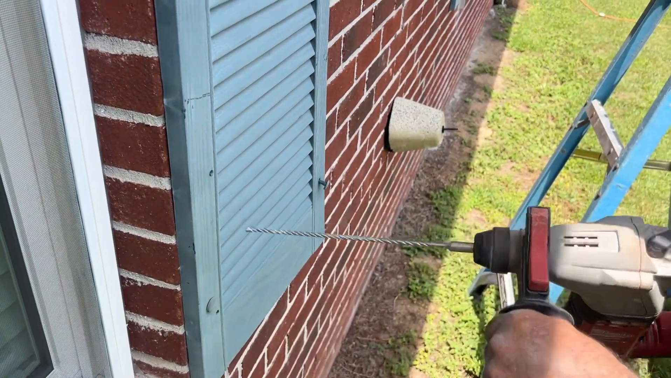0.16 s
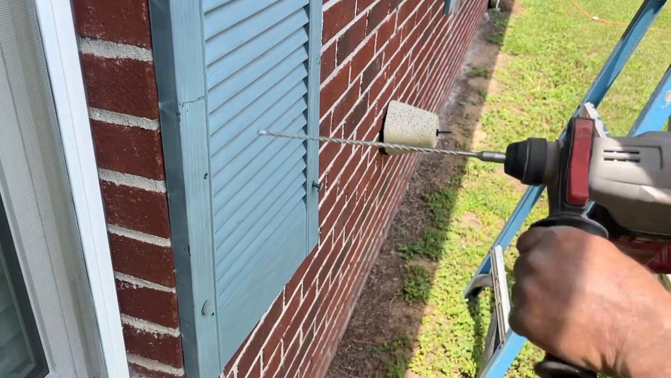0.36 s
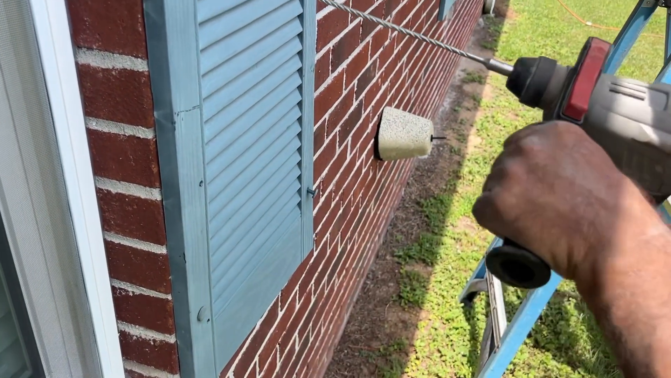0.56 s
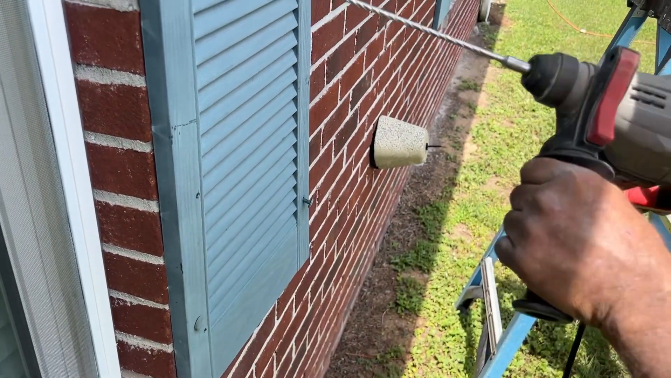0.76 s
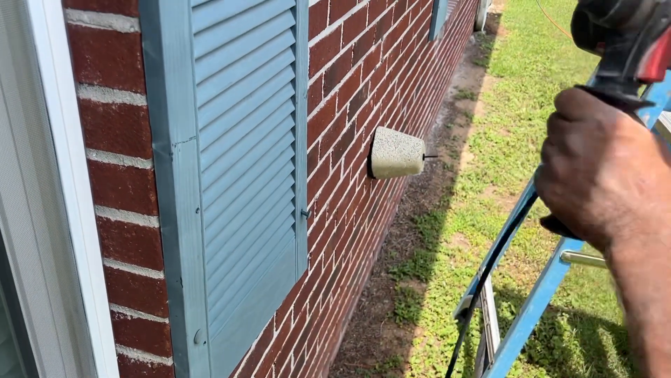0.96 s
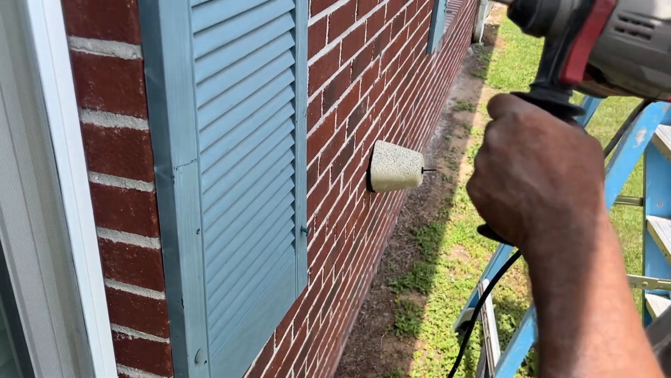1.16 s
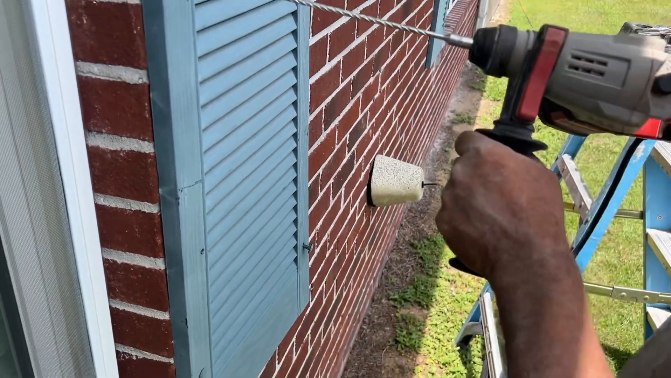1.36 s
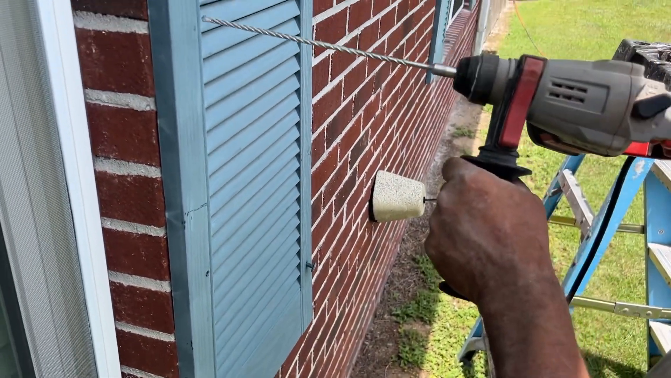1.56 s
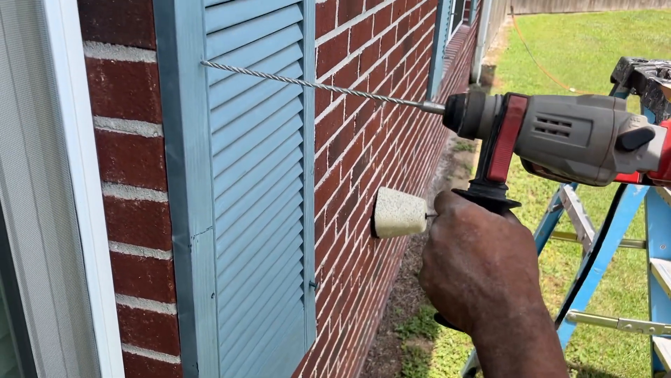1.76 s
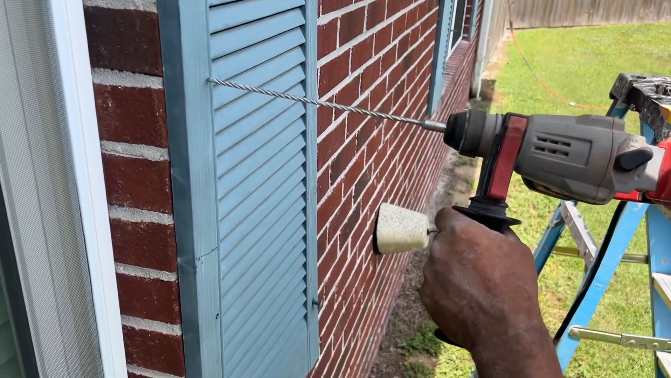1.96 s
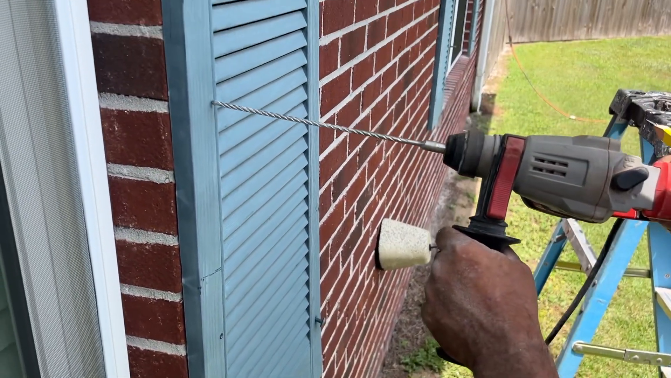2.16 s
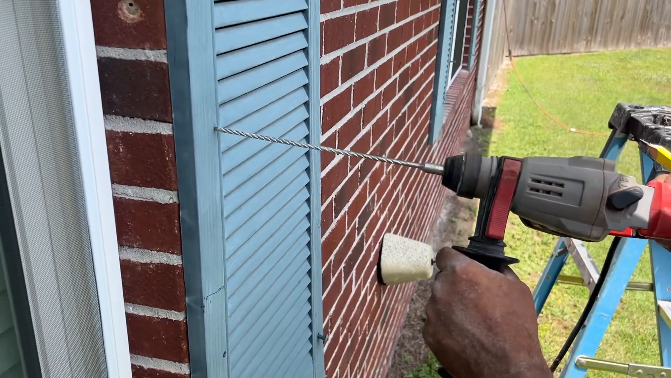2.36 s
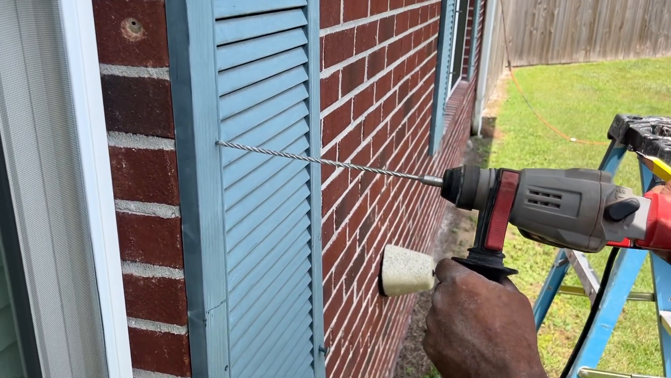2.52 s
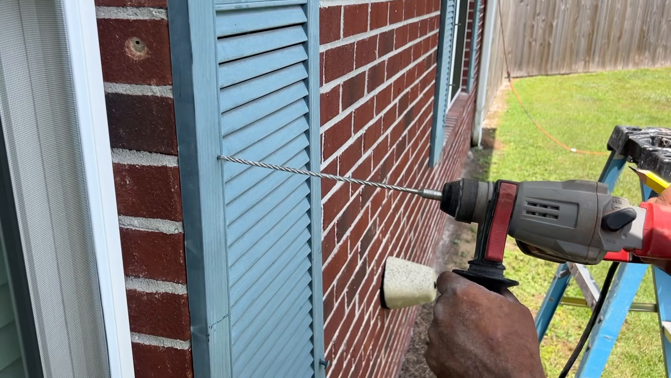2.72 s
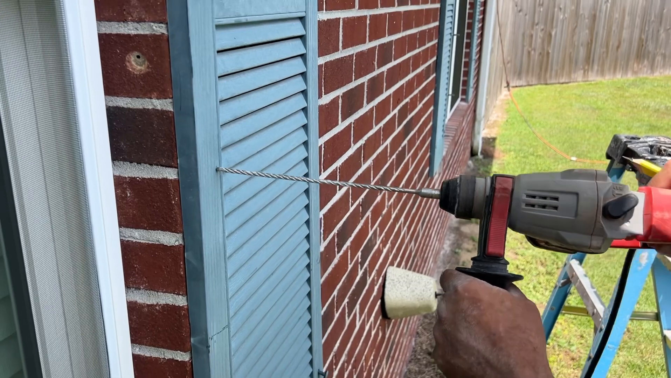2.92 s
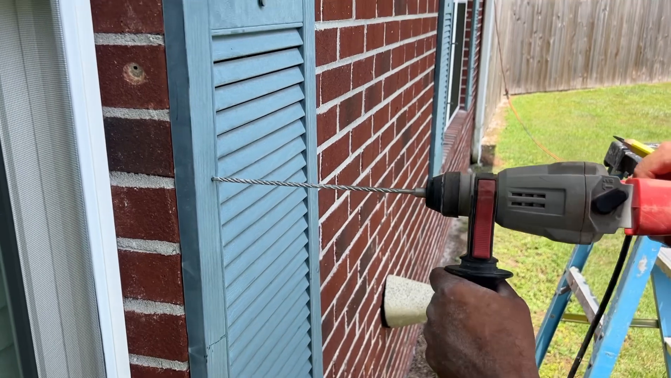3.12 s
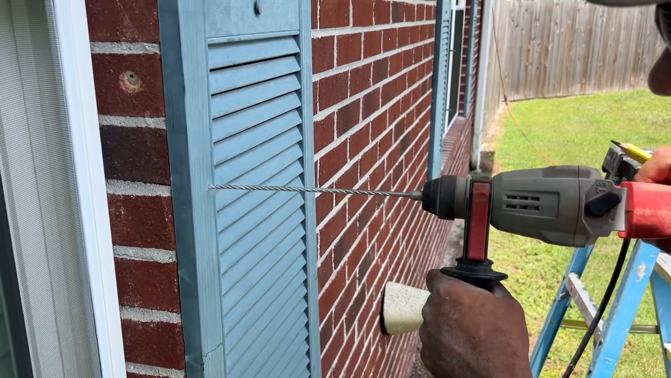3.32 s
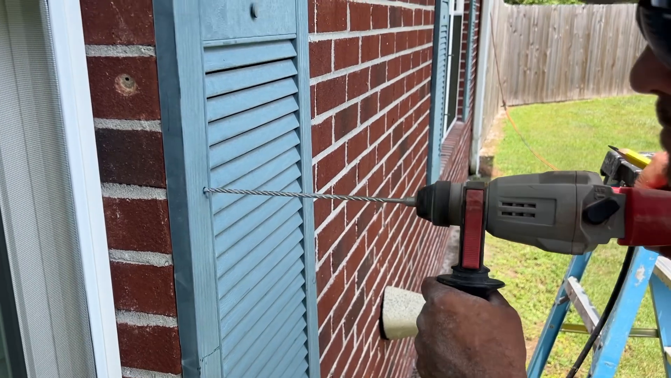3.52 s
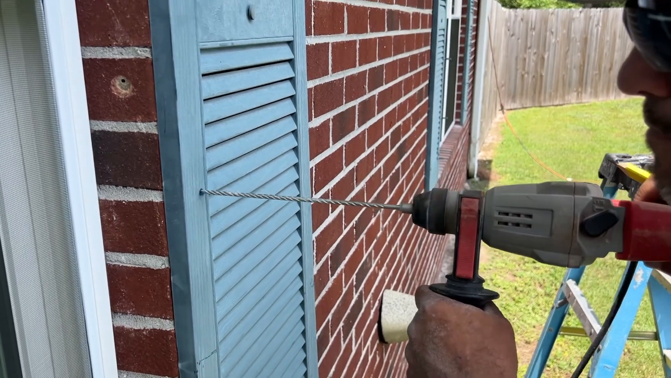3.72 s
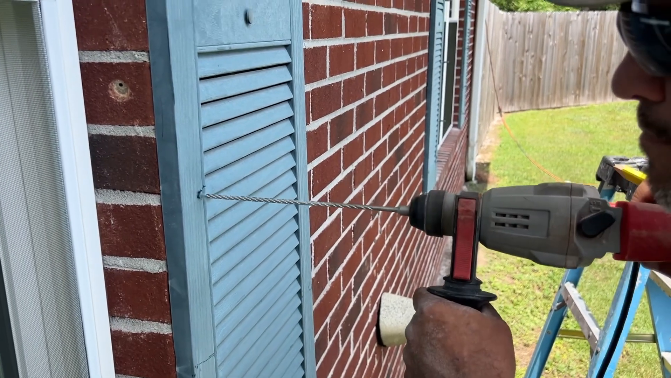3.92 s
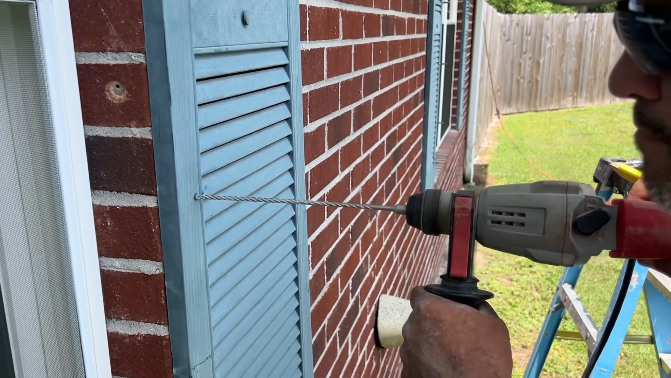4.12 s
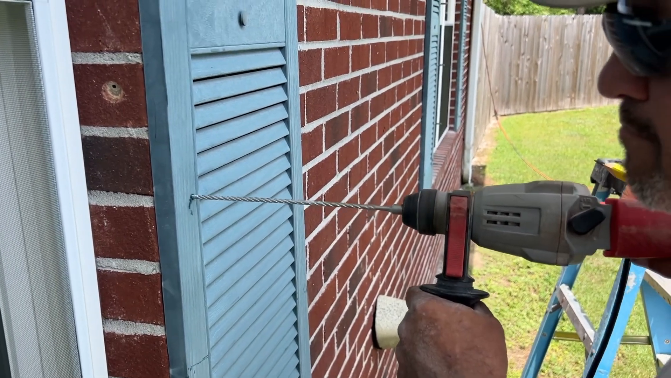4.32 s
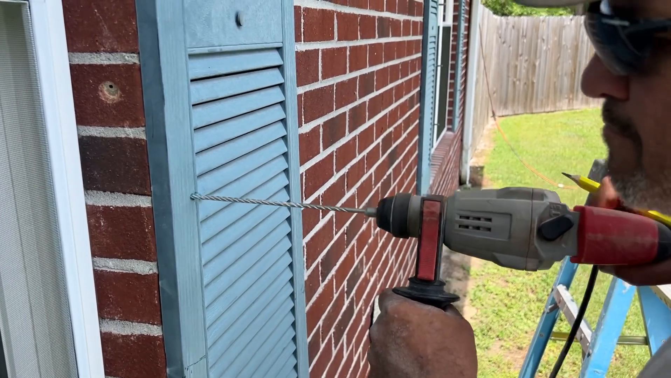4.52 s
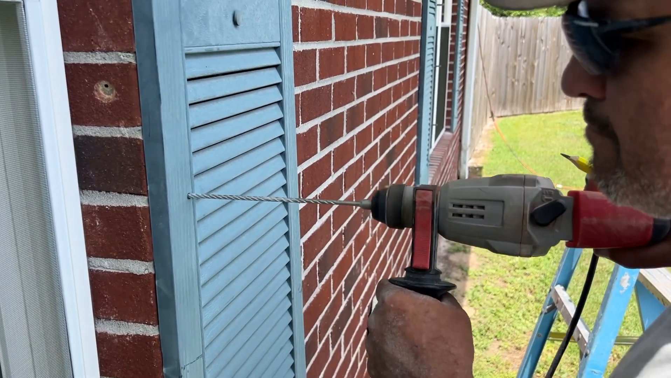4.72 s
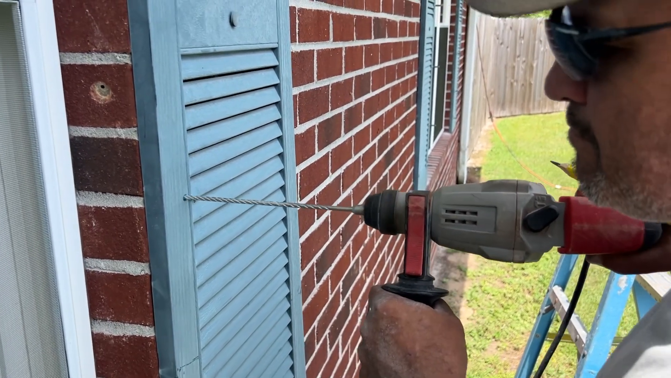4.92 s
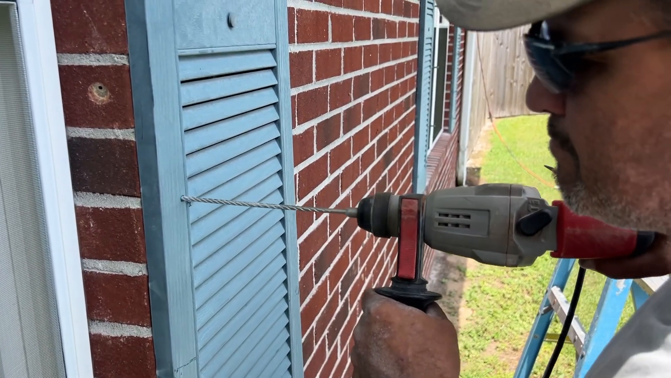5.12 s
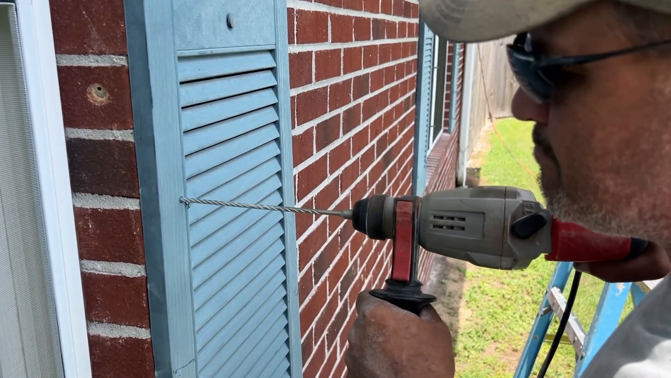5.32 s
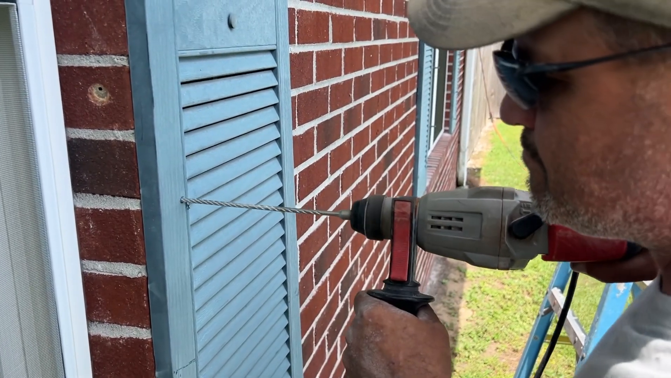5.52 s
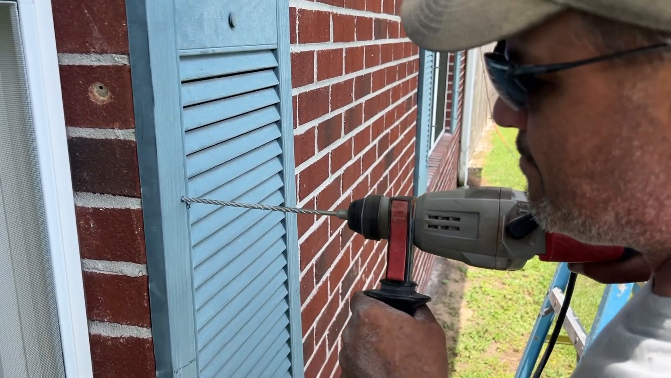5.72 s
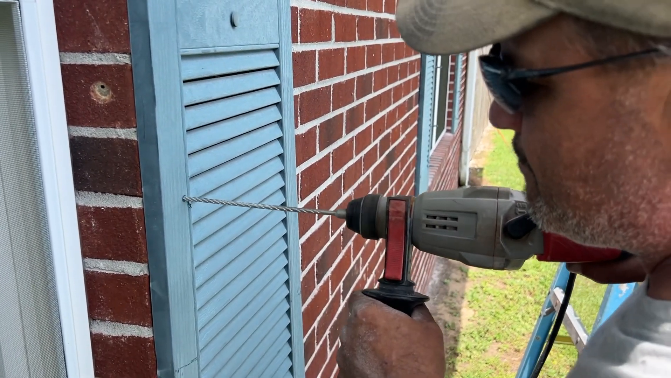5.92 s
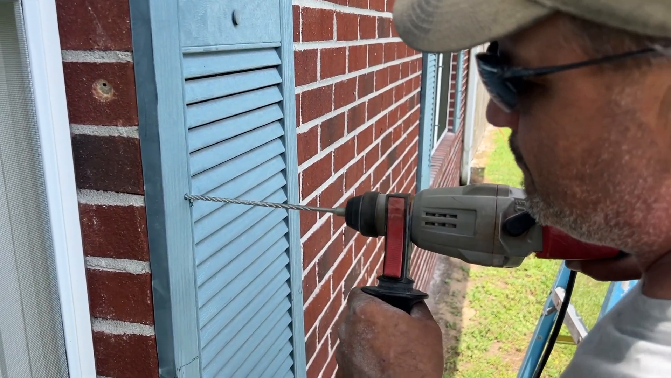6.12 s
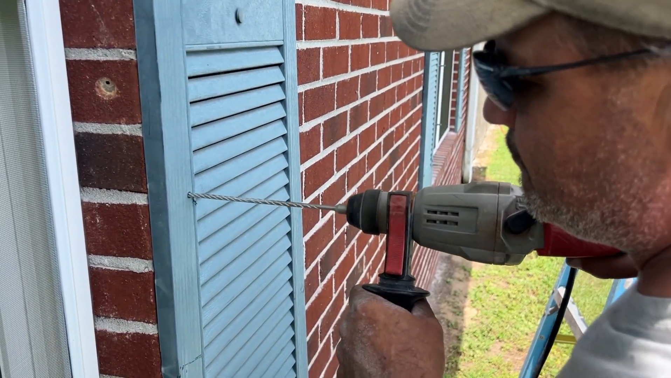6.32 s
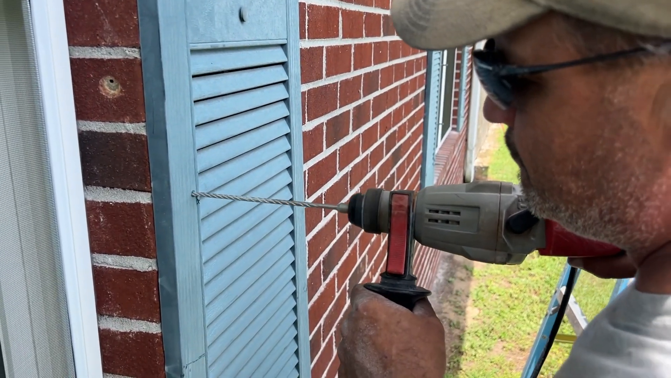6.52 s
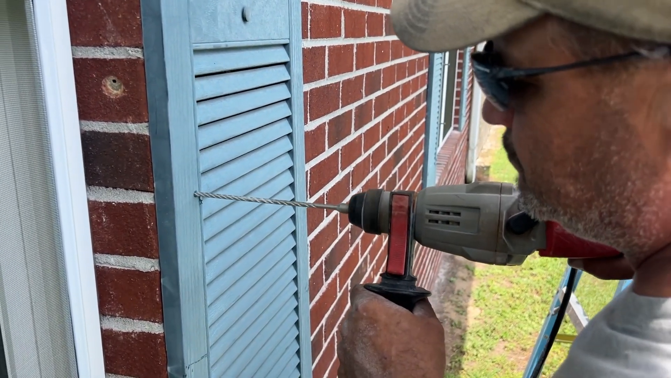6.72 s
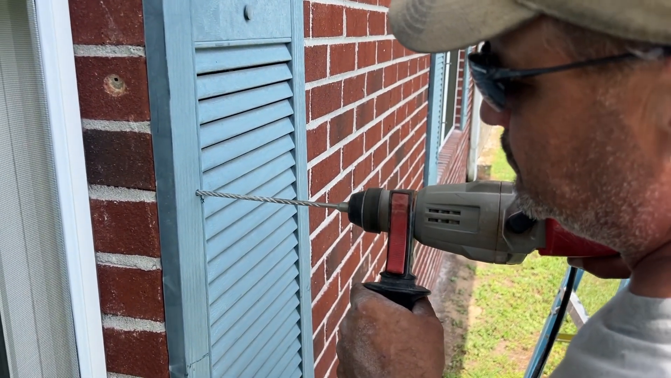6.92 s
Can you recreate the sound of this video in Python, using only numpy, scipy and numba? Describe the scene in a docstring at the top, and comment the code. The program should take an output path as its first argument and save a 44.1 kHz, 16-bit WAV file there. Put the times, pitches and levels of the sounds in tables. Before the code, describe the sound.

A rotary hammer clunks and coasts down to a stop, taps brick in a quiet yard, then restarts with ringing, clattering blows and drills in.

```python
"""A rotary hammer beside a brick house wall clunks and coasts to a stop: roaring noise and whine sink.
In the pause, over air and a hum heard throughout, the bit lightly touches the wall and birds whistle.
The motor spins up, and the striker rings the tool's resonances at every stroke, with cracks and thuds.
Then the bit bites, and the ringing blows sink into the noise of gears and fan and the piston's tones."""
import sys
import numpy as np
from scipy import signal
from scipy.fft import rfft, irfft
from scipy.io import wavfile
from scipy.ndimage import uniform_filter1d
from numba import njit

SR = 44100
rng = np.random.default_rng(int(sys.argv[2]) if len(sys.argv) > 2 else 0)


def store_wav(level_fs):
    """Save 16-bit WAV to argv[1]."""
    pcm = np.round(np.clip(np.atleast_2d(level_fs), -1, 1) * 32767)
    wavfile.write(sys.argv[1], SR, pcm.T.astype(np.int16))


N = 307377   # samples
TIME = np.arange(N) / SR   # seconds
BINS = np.maximum(np.arange(N // 2 + 1) * SR / N, 1)   # Hz

TRIGGER_S, BITE_S = 3.2, 4.48   # motor on; the bit bites
FIRST_BLOW_S = 3.2961


def from_db(db):
    """Turn a level in dB into a plain gain."""
    return 10 ** (np.asarray(db) / 20)


def rms_one(x):
    """Scale a signal to an rms of 1."""
    return x / np.sqrt(np.mean(x ** 2) + 1e-20)


def at_hz(points):
    """Read a table of (Hz, value) at every frequency, along a logarithmic pitch scale."""
    hz, values = np.transpose(points)
    return np.interp(np.log(BINS), np.log(hz), values)


def drift(rate_hz):
    """Smooth random wavering with an rms of 1; a higher rate wavers faster."""
    # made at a fortieth of the sample rate, then filled in
    r = np.exp(-80 * np.pi * rate_hz / SR)
    slow = signal.lfilter([1], [1, -2 * r, r * r], rng.standard_normal(N // 40 + 2002))[2000:]
    return np.interp(np.arange(N) / 40, np.arange(len(slow)), rms_one(slow))


def ring(clicks, hz, t60):
    """Each click starts a dying sine, as in a struck bar; it falls 60 dB in t60 seconds."""
    r = from_db(-60 / (t60 * SR))
    turn = 2 * np.pi * hz / SR
    return signal.lfilter([0, np.sin(turn)], [1, -2 * r * np.cos(turn), r * r], clicks + 1e-18)


def swell_and_ring(clicks, hz, t60):
    """Bending waves spread out along the bit, so a mode builds up, the lower the slower."""
    build_up_s = .0024 * np.sqrt(7700 / hz)
    return ring(clicks, hz, t60) - ring(clicks, hz, build_up_s)


# How wide the noise sounds in stereo.
# Each row: frequency in Hz, level of the side signal (left against right) next to the middle in dB.
STEREO_WIDTH = [(60, -29.5), (110, -16.5), (200, -23), (380, -12.5), (700, -8.5), (1290, -17),
                (2380, -14.5), (4400, -8.5), (5600, -7), (8120, -9.5), (11000, -5.5), (15000, -1.5)]


def wide(gain, source):
    """Two unrelated noises become the middle and side of a stereo sound, coloured; rms 1."""
    mid, side = rfft(source) * gain
    side = side * from_db(at_hz(STEREO_WIDTH))
    return rms_one(irfft(np.array([mid + side, mid - side]), N))


TOP_SPEED = 97   # strokes per s
COAST_AT_S, COAST_SPEED = .2, 90.5   # a moment of the coasting; strokes per s then
COAST_DRAG_S, COAST_FRICTION = 2.11, 78.5   # s; strokes per s
# How fast the piston runs under power.
# Each row: time in seconds, speed in strokes per second.
POWERED_SPEED = [(3.2, 0), (3.2964, 33.02), (3.34, 46.51), (3.4, 60.84), (3.5, 73.09), (3.62, 82.13),
                 (3.8, 89.35), (4.0, 93.35), (4.2, 95.29), (4.45, 95.95), (4.7, 94.65), (4.95, 92.82),
                 (5.2, 90.5), (5.7, 89.5), (6.3, 90.75), (6.97, 89.89)]


def speed():
    """Strokes per second: drag and friction slow the coasting motor to a stop; power follows its curve."""
    drag = np.exp((COAST_AT_S - TIME) / COAST_DRAG_S)
    coast = (COAST_SPEED + COAST_FRICTION) * drag - COAST_FRICTION
    powered = np.interp(TIME, *np.transpose(POWERED_SPEED))
    return np.where(TIME < TRIGGER_S, np.clip(coast, 0, TOP_SPEED), powered)


def strokes():
    """Count the piston's strokes by adding up its speed; a whole number falls on each blow."""
    turns = np.cumsum(speed()) / SR
    return turns - turns[round(FIRST_BLOW_S * SR)]


def by_state(coasting, idling, biting):
    """One value for each state of the tool; idling blends quickly into biting."""
    bitten = np.clip((TIME - BITE_S) / .04 + .5, 0, 1)
    return np.where(TIME < TRIGGER_S, coasting, idling + bitten * (biting - idling))


CRAWL = 11.1   # strokes per s added in the level law, so that a slow motor still sounds
SURGE_RISE_S, SURGE_S = 0.067, 0.86   # rise and decay of the surge at the bite
WAKE_DB, WAKE_S = 27, 0.029   # held back at the trigger; how fast that fades
STOP_DB, STOP_DB_PER_S = -12, -250   # drop, then fade, when the motor stands


def level_db(law, crawl=CRAWL):
    """Level that follows the speed and, after the bite, surges and creeps up; it dies at rest."""
    coast_db, coast_power, idle_db, idle_power, bite_db, surge_db, creep_db_per_s = law
    v = speed()
    since_bite = np.maximum(TIME - BITE_S, 0)
    ratio_db = 20 * np.log10((v + crawl) / TOP_SPEED)
    wake_db = WAKE_DB * np.exp(-np.maximum(TIME - TRIGGER_S, 0) / WAKE_S)
    surge = (1 - np.exp(-since_bite / SURGE_RISE_S)) * np.exp(-(since_bite / SURGE_S) ** 2)
    db = by_state(coast_db + coast_power * ratio_db, idle_db + idle_power * ratio_db - wake_db,
                  bite_db + surge_db * surge + creep_db_per_s * since_bite)
    stopped_db = db + STOP_DB + STOP_DB_PER_S * np.cumsum(v == 0) / SR
    return uniform_filter1d(np.where(v > 0, db, stopped_db), size=400)


@njit
def add_resonance(out, x, turn, r, gain):
    """Add a two-pole resonance with a moving centre to out: it echoes its own last two samples."""
    for row in range(x.shape[0]):
        y1 = y2 = 0.
        for i in range(2, x.shape[1]):
            y = (1 - r * r) / 2 * (x[row, i] - x[row, i - 2]) + 2 * r * turn[i] * y1 - r * r * y2
            y1, y2 = y, y1
            out[row, i] += gain[i] * y


WANDER, FLICKER_DB = 0.006, 0.8   # each resonance strays in pitch (share) and strength
# when the motor coasts fast, coasts slowly, and the tool is held to the wall, in seconds
SHELL_STATES_S = (.3, 1.3, 3.2)
# Resonances of the tool's housing.
# Each row: centre in Hz coasting fast, coasting slowly and held to the wall, width in Hz,
# lift in dB held clear of the wall, lift in dB held to the wall.
HOUSING_RESONANCES = [(730, 630, 725, 200, 7, 2.5), (965, 1090, 1085, 135, 7, 6.5),
                      (1180, 1380, 1200, 65, 9, 4), (1452, 1800, 1535, 105, 1.5, 5.5),
                      (2080, 2020, 2255, 130, 3, 7), (2330, 2555, 3400, 92, 4.5, -1),
                      (2850, 2900, 2850, 140, 8, 8.5), (2960, 3170, 3190, 205, 7, 3),
                      (3900, 4500, 3960, 150, 5.5, 2.3), (4420, 5100, 4285, 255, 2.5, 4.5),
                      (6200, 6300, 6155, 180, 2.5, 5), (7280, 6700, 6100, 210, 5, 5),
                      (8500, 8200, 8640, 340, 4.5, 6), (8830, 9400, 9230, 350, 4.5, 10)]


def housing(x):
    """The shell resonates: each resonance lifts its band, sliding, straying and flickering."""
    out = x.copy()
    for *hz, width_hz, clear_db, pressed_db in HOUSING_RESONANCES:
        centre = np.interp(TIME, SHELL_STATES_S, hz) * (1 + WANDER * drift(6.4))
        lift_db = np.where(TIME < TRIGGER_S, clear_db, pressed_db) + FLICKER_DB * drift(20.0)
        turn = np.cos(2 * np.pi * centre / SR)
        add_resonance(out, x, turn, np.exp(-np.pi * width_hz / SR), from_db(lift_db) - 1)
    return out


THROB_COASTING, THROB_IDLING, THROB_BITING = 0.063, 0.45, 0.18   # relative depth, 0-1
SLOW_THROB = 0.45   # extra depth as the coasting motor slows
RATTLES_PER_S, RATTLE_DB = 600, 8.5   # loose gear teeth: how often; added strength
# How loud the parts of the roar are before the housing lifts them: rumble, gears, grit, fan.
# Each row: coasting level in dB at top speed, power of speed, idling level in dB at top speed,
# power of speed, biting level in dB, surge at the bite in dB, creep in dB per second.
ROAR_LEVELS = [(-51, 1.6, -55, -1.04, -53.5, 10.5, 2.5), (-28, 1.96, -32, -0.12, -34.5, 3, 1.38),
               (-26, 2.22, -29.5, 0.7, -33, 1.5, 0.88), (-31.5, 2.57, -35, 1.9, -35, 3.5, 0.65)]
# Extra speed in the level law for each of those parts, in strokes per second.
ROAR_CRAWLS = (7.4, 7.4, 4, 3.1)
# Tone colour of the roar before the housing.
# Each row: frequency in Hz, relative level in dB per Hz.
ROAR_SPECTRUM = [(25, -43), (45, -12.5), (90, -16.5), (300, -10), (480, -11), (600, -8.5), (1000, -7),
                 (2500, -4), (3400, -8.5), (4700, -12), (5100, -12.5), (5800, -13), (7000, -12),
                 (9300, -14.5), (12000, -15), (16000, -22)]


def roar(phase):
    """Gear rattle, grit and fan: noise that swells at each stroke, through the housing resonances."""
    levels_db = [level_db(law, crawl) for law, crawl in zip(ROAR_LEVELS, ROAR_CRAWLS)]
    depth = by_state(THROB_COASTING, THROB_IDLING, THROB_BITING)
    depth = depth + SLOW_THROB * (TIME < TRIGGER_S) * (1 - speed() / TOP_SPEED)
    colour = from_db(at_hz(ROAR_SPECTRUM))
    # neighbouring low-pass curves leave one band for each part
    low_passes = [1 / (1 + (BINS / hz) ** 8) for hz in (470, 3350, 9600)]
    bands = np.diff([0 * BINS] + low_passes + [1 + 0 * BINS], axis=0)
    # a burst after the forward stroke, a weaker one on the return
    burst = np.exp(-(phase % 1) / 0.19) + 0.11 * np.exp(-((phase + .5) % 1) / .25)
    swells = (1.2, 2.4, 3., 3.5)
    grains_db = (0.93, 0.66, 0.91, 0.93)   # fast flicker
    out = 0
    for band, db, swell, grain_db in zip(bands, levels_db, swells, grains_db):
        throb = 1 + swell * np.clip(depth, 0, 1) * burst
        rattle = 1 + from_db(RATTLE_DB) * (rng.random(N) < RATTLES_PER_S / SR)
        noise = rng.standard_normal((2, N)) * rattle * throb * from_db(grain_db * drift(290))
        # the throb must not change the average level
        noise = noise / uniform_filter1d(throb, size=4000)
        out = out + wide(colour * band, noise) * from_db(db + 0.3 * drift(28.0))
    return housing(out)


WHINE_ORDER, ROTOR_ORDER = 190, 4.87   # cycles per stroke
WHINE_POWERED_DB = -8.5   # change of the whine under power
# Commutator whine, by the pitch it has at the moment.
# Each row: pitch in Hz, level in dB when coasting.
WHINE_LEVELS = [(3500, -86), (5000, -49), (6400, -43), (7700, -32.5), (9300, -49), (10600, -47),
                (13000, -31.5), (16000, -29.5), (18000, -35.5)]
# Gear teeth under load.
# Each row: cycles per stroke, level in dB at full load.
GEAR_MESH = [(34, -39), (68, -53)]
# The once-a-turn tone of the unbalanced rotor.
# One row: coasting level in dB at top speed, power of speed, idling level in dB at top speed,
# power of speed, biting level in dB, surge at the bite in dB, creep in dB per second.
ROTOR_UNBALANCE = (-47.5, 2.0, -56.5, 17, -57.5, 16, 5.5)


def rotor(phase):
    """Commutator whine, gear mesh and the once-a-turn tone: sines all tied to the speed."""
    pitch = WHINE_ORDER * speed()
    heard = (pitch > 0) & (pitch < .4 * SR)
    whine_db = np.interp(pitch, *np.transpose(WHINE_LEVELS)) + WHINE_POWERED_DB * (TIME > TRIGGER_S)
    whine_angle = 2 * np.pi * WHINE_ORDER * phase + 1.1 * drift(40) + .6 * drift(260)
    whine = heard * from_db(whine_db + 3.2 * drift(25)) * np.sin(whine_angle)
    mesh = 0
    for order, db in GEAR_MESH:
        tooth_angle = 2 * np.pi * order * phase + 0.47 * drift(21)
        mesh = mesh + from_db(db + 1.0 * drift(8)) * np.sin(tooth_angle)
    load = np.clip((TIME - 4.5) / .5, 0, 1)
    turn_gain = from_db(level_db(ROTOR_UNBALANCE) + 0.73 * drift(14))
    return load * mesh + whine + turn_gain * np.sin(2 * np.pi * ROTOR_ORDER * phase)


# Moments when the low thud swells, in the middle or in opposite sense left and right.
# Each row: time in seconds, width in seconds, strength in the middle, strength in opposite sense
# (about 0 to 1).
LOW_SURGES = [(3.335, 0.03, 1.0, 0), (3.382, 0.037, 0, 0.88), (3.436, 0.01, 0.4, 0.77),
              (3.455, 0.0092, 0.1, .9), (3.494, 0.03, 1.05, 0.1), (3.551, 0.012, 0, 0.9),
              (3.575, 0.011, 0.1, 0.4), (3.603, 0.014, 0.3, 0.9), (3.652, 0.018, 0.1, 0.7),
              (3.752, 0.0064, 0.1, 0.6)]


def low_surge(s, axis):
    """Strength of the surges at times s, middle (axis 0) or opposite (axis 1): a row of smooth humps."""
    return sum(share[axis] * np.exp(-((s - at) / width) ** 2) for at, width, *share in LOW_SURGES)


SETTLED_S = (4.88, 5.07)   # the bit settles in its hole: from, to
PISTON_START, PISTON_LAG, PISTON_SPREAD = .6, .11, 1.15   # delay of the sines, in their own cycles
LOW_TONES_DIP_DB = -27   # change of the low multiples while the left-right thumps sound
# How loud the piston's tones are: first multiples 1 to 4 of the stroke rate, then the higher ones.
# Each row: coasting level in dB at top speed, power of speed, idling level in dB at top speed,
# power of speed, biting level in dB, surge at the bite in dB, creep in dB per second.
PISTON_LEVELS = [(-48, 4.1, -34.5, 1.2, -48.5, 18.5, 5.5), (-51.5, 8, -44.5, 3.5, -47, 1.9, 1.6)]
# What each multiple 1, 2, 3 .. of the stroke rate adds to that level.
# Each row: dB coasting or idling, dB as the bit bites, dB once settled.
PISTON_MULTIPLES = [(-8, -9.5, -11), (-17, -17, -16.5), (-12.5, -8, -9.5), (-14, -11.5, -18),
                    (-2.5, -15, -15), (3.5, -3, 2), (-0.5, -1, -6.5), (-12.5, 0.5, -8.5), (-1.5, -8, -2.5),
                    (0.5, 1, -1.5), (-0.5, -4, 3), (-4, 1, 7.5), (-2.5, -9, -8.5), (0, -18, 3.5),
                    (-8, -15, -5), (-6, -14, -3.5), (-5.5, -15, 0), (-11, -15, -2), (8.5, -8, 4),
                    (2.5, -8, -3.5), (-8.5, -13, -1.5), (-3.5, -3, -1), (-7, 1, -7.5), (-9.5, -8, -2.5),
                    (-8, -4, 1.5), (-2, -13, 0.5)]


def piston(phase):
    """Pumping makes steady multiples of the stroke rate that waver; low ones come later after the blow."""
    low_db, high_db = (level_db(law) for law in PISTON_LEVELS)
    low_db = low_db + LOW_TONES_DIP_DB * np.minimum(low_surge(TIME, axis=1), 1)
    settled = np.interp(TIME, SETTLED_S, [0, 1])
    out = 0
    for order, (idle_db, bite_db, settled_db) in enumerate(PISTON_MULTIPLES, 1):
        common_db = low_db if order <= 4 else high_db
        held_db = bite_db + settled * (settled_db - bite_db)
        own_db = by_state(idle_db, idle_db, held_db) + 2.2 * drift(5.1)
        late = PISTON_START + PISTON_LAG * order + PISTON_SPREAD * np.log(order)
        late = late + (order > 11) * rng.random()   # high multiples start anywhere
        out = out + from_db(common_db + own_db) * np.sin(2 * np.pi * (order * phase - late))
    return out


YARD_DB = -70   # before its flat gain in record()
HUM_HZ, HUM_DB = 119.9, -68.5
# Tone colour of the yard.
# Each row: frequency in Hz, relative level in dB.
YARD_SPECTRUM = [(15, -52.5), (25, -11.5), (123, -5), (145, -10.5), (206, -21), (439, -19), (620, -22),
                 (887, -30.5), (1250, -31), (1440, -27.5), (1700, -31.5), (2050, -29), (3080, -41),
                 (5000, -50), (16000, -62.5)]


def yard():
    """Distant traffic and air as coloured noise, with a wavering mains hum as one sine."""
    noise = rng.standard_normal((2, N)) * from_db(2.2 * drift(8.6) + 1.5 * drift(40))
    air = wide(from_db(at_hz(YARD_SPECTRUM)), noise)
    hum = from_db(HUM_DB + 3. * drift(8)) * np.sin(2 * np.pi * HUM_HZ * TIME + 0.78 * drift(5))
    return from_db(YARD_DB) * air + hum


# Slack in the chuck as the load comes off.
# Each row: start in seconds, level in dB, pitch in Hz.
CHUCK_CLUNKS = [(.034, -9.5, 1204), (0.0481, -1.5, 1270)]


def clunks():
    """Loose parts knock together: sines that swell and die within milliseconds."""
    out = np.zeros(N)
    t = TIME[:800]
    shape = (t / 0.0016 * np.exp(1 - t / 0.0014)) ** 2
    for s, db, hz in CHUCK_CLUNKS:
        i = round(s * SR)
        out[i:i + len(t)] += from_db(db) * shape * np.sin(2 * np.pi * hz * t)
    return out


# Handling of the tool.
# Each row: start in seconds, level in dB, pitch in Hz.
HANDLING_BUMPS = [(0.034, -43, 160), (0.039, -40, 406), (0.04, -38.5, 500), (0.529, -62, 76),
                  (0.739, -44, 61.9), (0.849, -54, 72), (1.435, -52, 59.2), (1.509, -53, 56.5),
                  (1.799, -57, 51.4), (2.243, -70, 114.3), (3.072, -49, 50), (3.108, -44, 48),
                  (3.15, -46, 50), (4.515, -37, 160)]


def bumps():
    """Handling gives short, mostly low thumps: sines with a soft start."""
    out = np.zeros(N)
    t = TIME[:6000]
    shape = t / 0.0079 * np.exp(1 - t / 0.01)
    for s, db, hz in HANDLING_BUMPS:
        i = round(s * SR)
        out[i:i + len(t)] += from_db(db) * shape * np.sin(2 * np.pi * hz * t)
    return out


CHUCK_LEAD_S = .0003   # chuck and body sound before the far end of the bit
# Ways the tool rings: the bit above 4000 Hz, the chuck down to 1400 Hz, the body below.
# Each row: pitch in Hz, relative level in dB, time in seconds to fall by 60 dB.
TOOL_MODES = [(7824, 14.5, 0.006), (7715, -1, 0.036), (7815, -1, 0.03), (8075, -9, 0.05), (8520, -2, .011),
              (9100, -10, 0.01), (6650, 0, 0.005), (7200, 1, 0.009), (5010, -10.5, 0.0054),
              (4850, -20, .006), (4240, -15, .02), (3930, -27, 0.0037), (2900, -16, 0.0024),
              (2080, 1, 0.0045), (1824, 5, 0.0054), (1455, 1.5, .005), (1225, -6.5, 0.051), (912, 3, 0.02),
              (610, -2.5, 0.021), (556, -2, 0.018), (433, -8, 0.018)]


def strike(at, ring_db, clatter_db, body_db, spread_db):
    """Each hit excites every mode with a strength of its own; low neighbours swing in opposite sense."""
    out = np.zeros(N)
    chance = rng.standard_normal((len(at), len(TOOL_MODES)))
    for k, (hz, db, t60) in enumerate(TOOL_MODES):
        part_db = ring_db if hz > 4000 else clatter_db if hz > 1400 else body_db
        sense = np.sign(hz - 7500) if hz > 4000 else (-1) ** k
        uneven_db = spread_db * chance[:, k] * (.5 if hz > 1400 else 1)
        clicks = np.zeros(N)
        lead = (hz < 4000) * round(CHUCK_LEAD_S * SR)
        clicks[at - lead] = sense * from_db(part_db + db + uneven_db)
        start = ring if 1400 < hz < 6000 else swell_and_ring
        out += start(clicks, hz, t60)
    return out


SCATTER_T60_S = 0.081
# Bit and tool touching the wall.
# Each row: time in seconds, level of the noise scatter in dB before its filter, level of the bit's ring
# in dB, level of clatter and body in dB.
WALL_TOUCHES = [(1.889, -72, -88.5, -73), (2.249, -78, -105, -70), (2.549, -73, -90, -66),
                (2.729, -63, -88, -74), (2.792, -52.5, -77, -63), (2.82, -70, -90, -70),
                (2.845, -74, -95, -79), (2.886, -65, -85, -78), (2.913, -45, -75, -69),
                (2.955, -58, -87, -64), (3.04, -38, -51, -41), (3.076, -55, -69, -48),
                (3.093, -25.5, -26, -27), (3.157, -50, -50, -47), (3.164, -48, -62, -43),
                (3.18, -46, -57, -58), (3.188, -32.5, -56, -27.5)]


def knocks():
    """Light touches ring the modes of the tool and leave a dying scatter of noise."""
    s, scatter_db, ring_db, body_db = np.transpose(WALL_TOUCHES)
    at = np.round(s * SR).astype(int)
    envelope = np.zeros(N)
    for i, db in zip(at, scatter_db):
        envelope[i:] += from_db(db - 60 * TIME[:N - i] / SCATTER_T60_S)
    band = signal.butter(1, [550, 4500], "band", fs=SR, output="sos")
    scatter = signal.sosfilt(band, rng.standard_normal(N))
    return strike(at, ring_db, body_db, body_db, spread_db=3.0) + envelope * scatter


# Far birds.
# Each row: start in seconds, length in seconds, start pitch in Hz, end pitch in Hz, level in dB.
BIRD_CALLS = [(2.3, 0.11, 1700, 1470, -84), (2.637, .06, 3550, 3100, -88), (2.313, .08, 3350, 2800, -86),
              (2.433, 0.05, 3050, 2080, -68), (2.496, 0.029, 1970, 2920, -66),
              (2.514, 0.023, 2880, 2080, -66), (2.535, .03, 2600, 2100, -82), (2.62, 0.03, 2270, 1800, -78),
              (2.645, .075, 1800, 1450, -81), (2.772, 0.024, 3000, 2760, -61),
              (2.814, 0.033, 1790, 2560, -71)]


def birds():
    """Birds whistle: gliding sines that flutter, smeared by far echoes."""
    out = np.zeros(N)
    for s, length, start_hz, end_hz, db in BIRD_CALLS:
        count, i = round(length * SR), round(s * SR)
        glide = np.cumsum(np.linspace(start_hz, end_hz, count)) / SR
        out[i:i + count] += from_db(db) * np.hanning(count) ** .5 * np.sin(2 * np.pi * glide)
    smear = rng.standard_normal(4000) * from_db(-28.0 - 60 * TIME[:4000] / 0.19)
    out = out * from_db(3. * drift(60))
    return out + signal.fftconvolve(out, smear)[:N]


BITE_FADE_S, SETTLE_SHAPE = 0.0065, 3   # change at the bite; early blows hold before they settle


def blow_db(part, s, axis=0):
    """Level of one part of the blows at times s: it settles, rises in a surge and changes at the bite."""
    first_db, early_db, settled_db, settle_s, bite_db, surge_db = part
    early = np.exp(-(abs(s - FIRST_BLOW_S) / settle_s) ** SETTLE_SHAPE)
    db = settled_db + (early_db - settled_db) * early + surge_db * low_surge(s, axis=axis)
    bitten = 1 / (1 + np.exp(np.clip((BITE_S - s) / BITE_FADE_S, -50, 50)))
    return np.append(first_db, (db + bitten * (bite_db - db))[1:])


# the thud drops in pitch: from, to; how fast; when its swell is loudest
THUD_FROM_HZ, THUD_TO_HZ, THUD_FALL_S, THUD_PEAK_S = 811, 59, 0.0045, 0.0057
# blows differ mode by mode, the body most: settled dB, extra dB at first, settling s
UNEVEN_DB, UNEVEN_EXTRA_DB, UNEVEN_S = 1.3, 2.6, .3
# the chuck bounces after each blow: earliest and latest; loss; level sideways
REBOUND_S, REBOUND_DB, REBOUND_SIDE_DB = (0.002, 0.007), -15, 1
# Parts of a blow: bit ring, chuck clatter, body, thud, crack.
# Each row: first blow in dB, early level in dB, settled level in dB, settling time in seconds,
# biting level in dB, gain in a surge in dB.
BLOW_PARTS = [(-13.5, -12.5, -16, 0.54, -52, 0), (-32, -6, -18, 0.53, -58.5, 0),
              (-15.5, -18.5, -16.5, 0.28, -32.5, 6.5), (-38, -47, -66, 0.56, -82, 22.5),
              (-13, -15.5, -34, 0.51, -24.5, 3)]
# Low falling thump, opposite in left and right, with a ring near 750 Hz.
# One row: first blow in dB, early level in dB, settled level in dB, settling time in seconds,
# biting level in dB, gain in a surge in dB.
OPPOSITE_THUMP = (-48, -49.5, -56, 0.7, -83, 31)


def hammer(phase):
    """The striker rings the tool at each stroke; a bright crack and low thumps sound with it."""
    at = np.flatnonzero((np.diff(np.floor(phase)) > 0) & (phase[1:] >= 0))
    ring_db, clatter_db, body_db, thud_db, crack_db = (blow_db(part, TIME[at]) for part in BLOW_PARTS)
    opposite_db = blow_db(OPPOSITE_THUMP, TIME[at], axis=1)
    chance = rng.standard_normal((len(at), 3))

    # crack: a short burst of bright noise
    cracks = np.zeros(N)
    cracks[at] = from_db(crack_db + 3.4 * chance[:, 0])
    fade = signal.lfilter([1], [1, -np.exp(-1 / (0.0016 * SR))], np.roll(cracks, 12))
    band = signal.butter(2, [3800, 13500], "band", fs=SR, output="sos")
    crack = signal.sosfilt(band, fade * rng.standard_normal(N))

    # thumps: a sine falling in pitch; the opposite one rings as well
    thumps = np.zeros((2, N))
    thumps[:, at] = from_db([thud_db, opposite_db] + 1.3 * chance[:, 1:].T)
    t = TIME[:3000]
    hz = THUD_TO_HZ + (THUD_FROM_HZ - THUD_TO_HZ) * np.exp(-t / THUD_FALL_S)
    swell = t / THUD_PEAK_S * np.exp(1 - t / THUD_PEAK_S)
    drop = swell * np.sin(2 * np.pi * np.cumsum(hz) / SR)
    middle, opposite = signal.oaconvolve(thumps, drop[None])[:, :N]
    opposite = opposite + from_db(19.5) * swell_and_ring(thumps[1], 750, 0.018)
    thud = np.array([middle + opposite, middle - opposite])

    at_first = np.exp(-((TIME[at] - FIRST_BLOW_S) / UNEVEN_S) ** 2)
    steady = strike(at, ring_db, clatter_db, body_db, spread_db=UNEVEN_DB + UNEVEN_EXTRA_DB * at_first)
    wait_s = np.interp(rng.random(len(at)), [0, 1], REBOUND_S)
    late = np.minimum(at + (wait_s * SR).astype(int), N - 1)
    bounce = strike(late, ring_db - 18, clatter_db, body_db - 3.0, spread_db=5.5)
    rebound = from_db(REBOUND_DB) * bounce
    sideways = from_db(REBOUND_SIDE_DB) * np.array([rebound, -rebound])
    return near_wall(steady + crack + rebound) + sideways + thud


# Echoes from wall and ground, one list for the left channel and one for the right.
# Each row: delay in seconds, level in dB.
WALL_ECHOES = [
    [(.0009, -25), (.0029, -21), (.0047, -24)],
    [(.0016, -24), (.0024, -20), (.0055, -22)],
]


def near_wall(x):
    """Wall and ground send the sound back: the direct sound plus delayed, softer copies."""
    out = np.array([x, x])
    for channel, taps in enumerate(WALL_ECHOES):
        for s, db in taps:
            lag = round(s * SR)
            out[channel, lag:] += from_db(db) * x[:-lag]
    return out


# How far the left of the two microphone ports is ahead.
# Each row: frequency in Hz, lead of the left in radians.
LEFT_LEAD = [(100, 0), (600, .35), (1400, .15), (2300, .05), (2800, .6), (4000, .35), (5000, -.3),
             (5700, -1), (7300, -1.2), (10500, -1.1), (15000, -1.75), (22000, -2)]


def ports(x):
    """The two microphone ports hear the tool with a phase lead that depends on pitch."""
    turn = np.exp(.5j * at_hz(LEFT_LEAD))
    return irfft(rfft(x) * np.array([turn, 1 / turn]), N)


def scene():
    """Tool by the wall, in the yard."""
    phase = strokes()
    echoing = near_wall(rotor(phase) + clunks() + knocks() + birds())
    tool = echoing + roar(phase) + piston(phase) + hammer(phase)
    return ports(tool) + yard() + bumps()


def record(dry):
    """Peaks are rounded, deep bass is lost, the top is cut."""
    rounded = 1.143 * np.tanh(dry / 1.477)
    x = signal.sosfilt(signal.butter(2, 32, "high", fs=SR, output="sos"), rounded)
    # at least 70 dB down from 16300 Hz upward
    return signal.sosfilt(signal.cheby2(16, 70, 16300, fs=SR, output="sos"), x)


dry = scene()
out = record(dry)
store_wav(out)
```